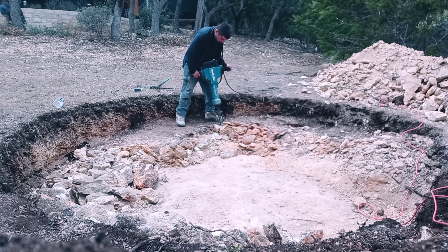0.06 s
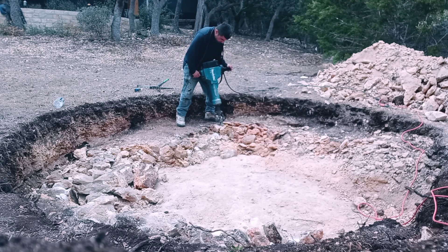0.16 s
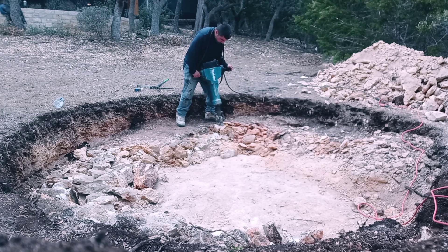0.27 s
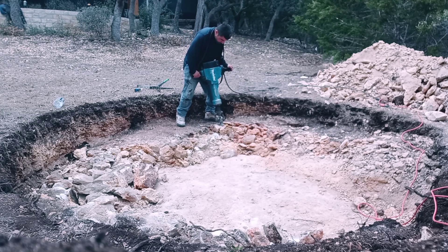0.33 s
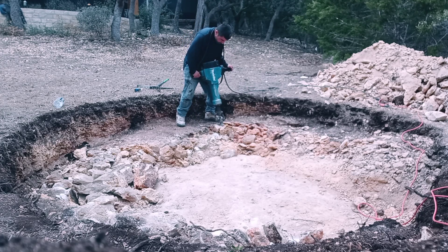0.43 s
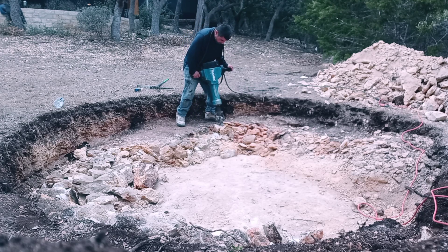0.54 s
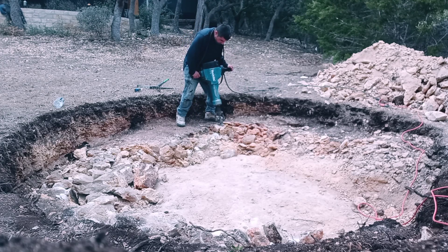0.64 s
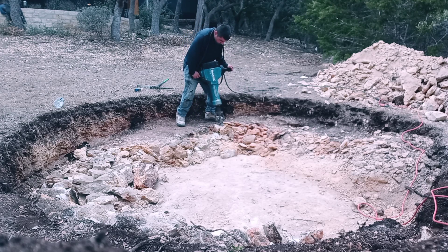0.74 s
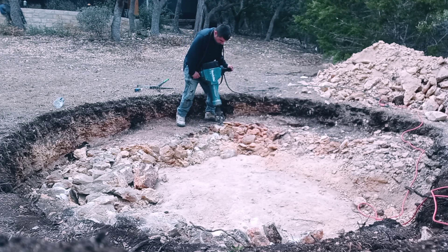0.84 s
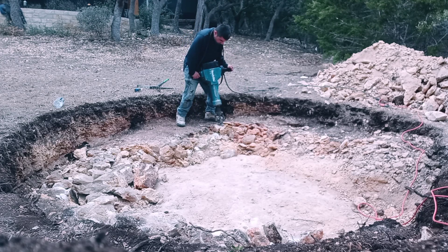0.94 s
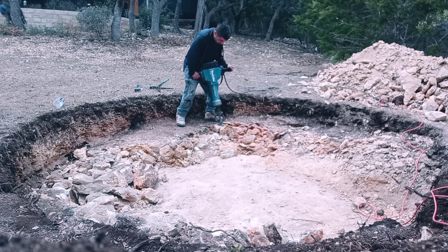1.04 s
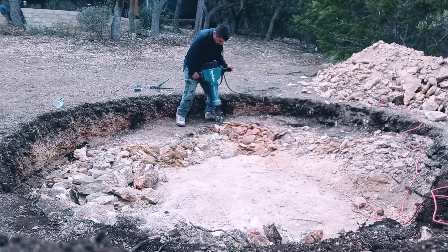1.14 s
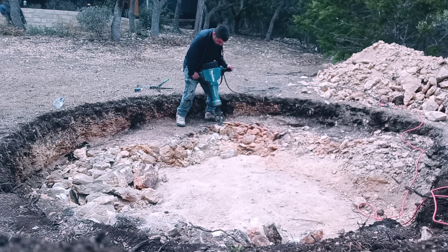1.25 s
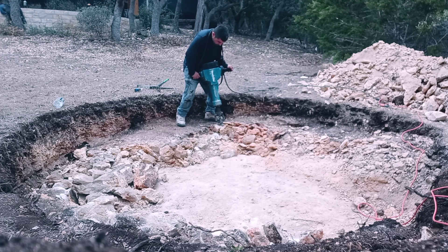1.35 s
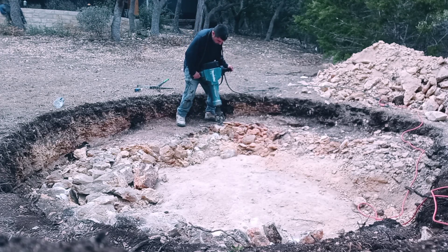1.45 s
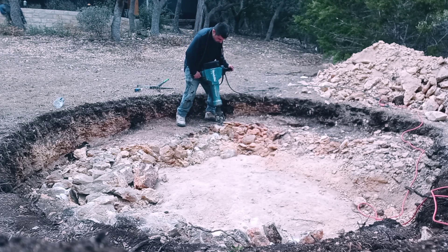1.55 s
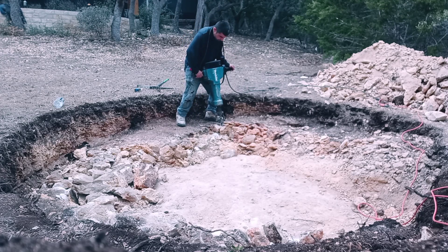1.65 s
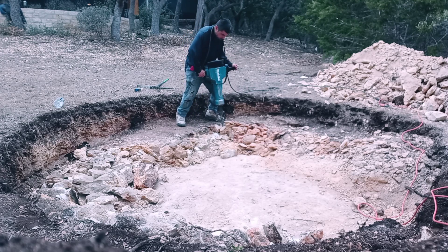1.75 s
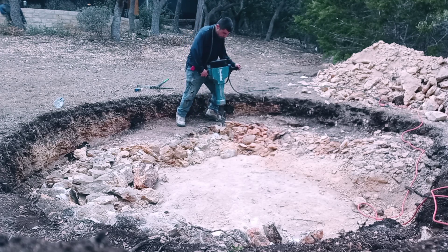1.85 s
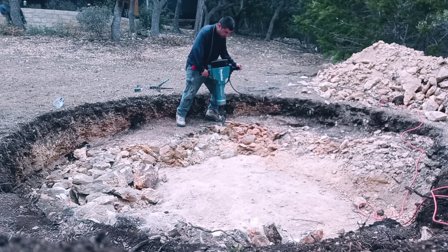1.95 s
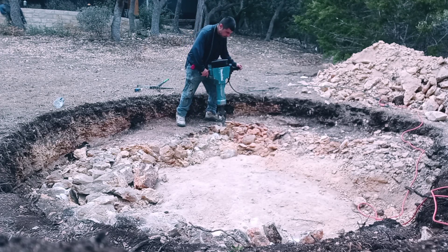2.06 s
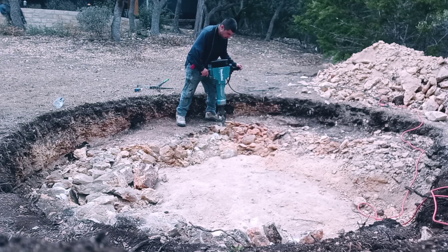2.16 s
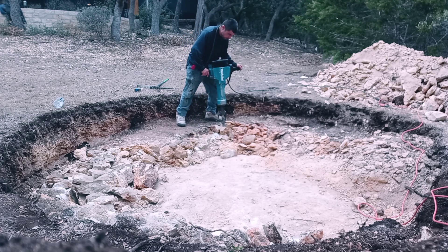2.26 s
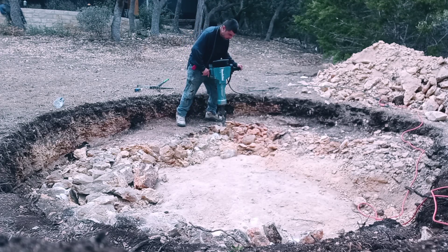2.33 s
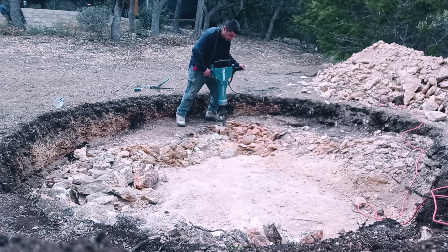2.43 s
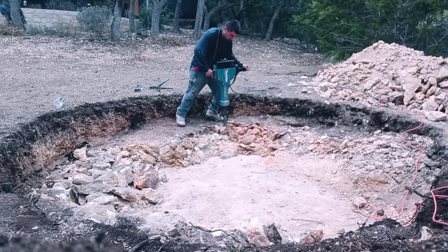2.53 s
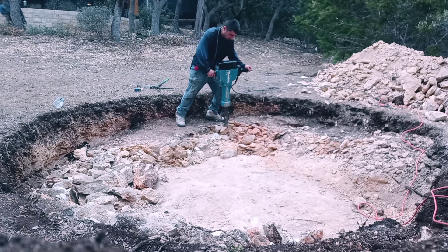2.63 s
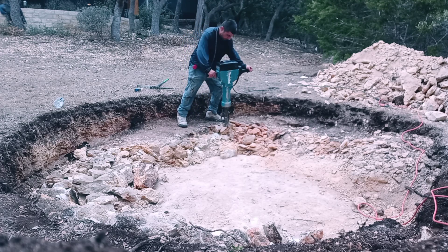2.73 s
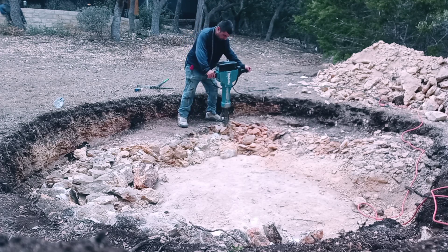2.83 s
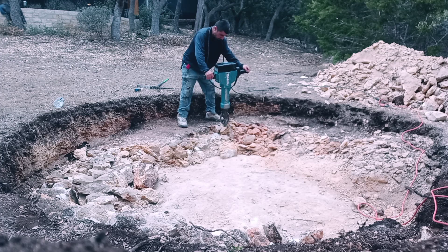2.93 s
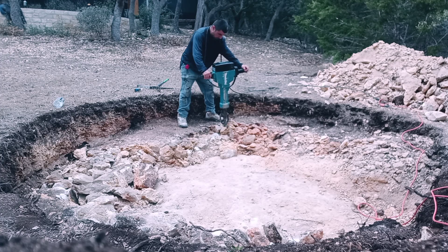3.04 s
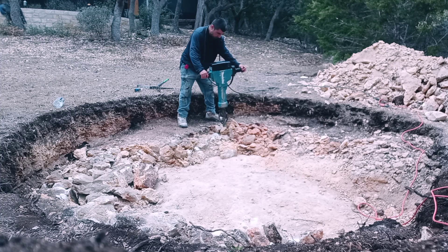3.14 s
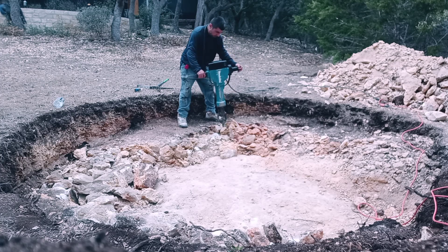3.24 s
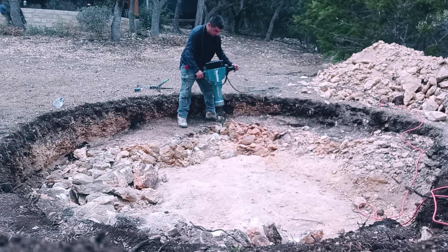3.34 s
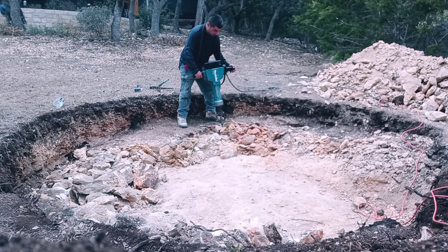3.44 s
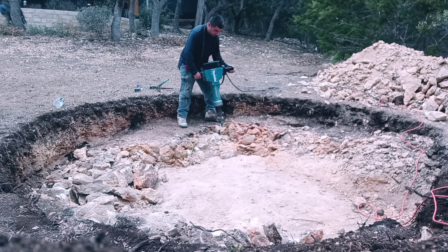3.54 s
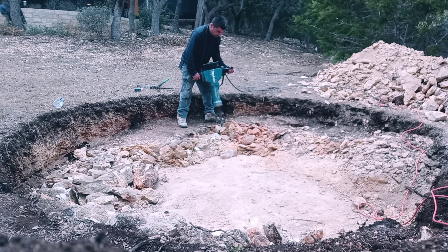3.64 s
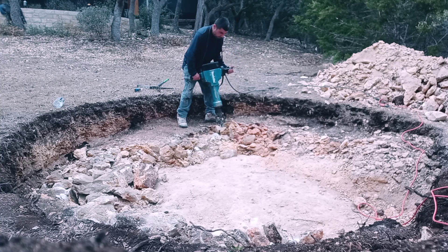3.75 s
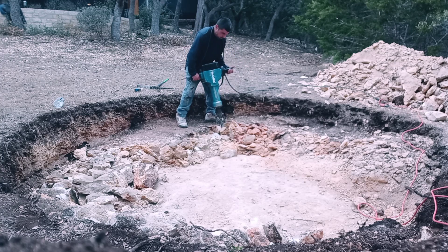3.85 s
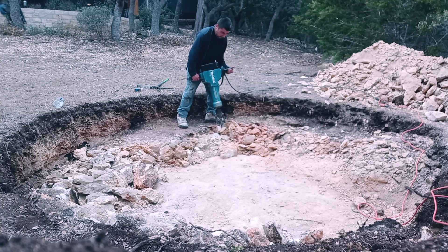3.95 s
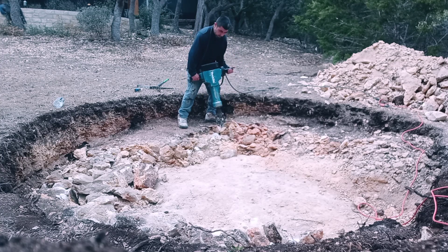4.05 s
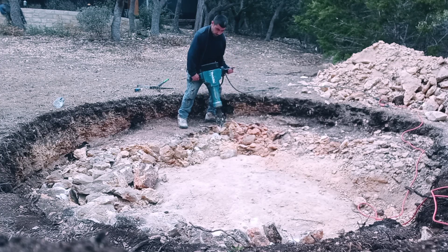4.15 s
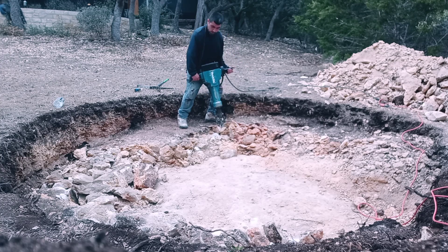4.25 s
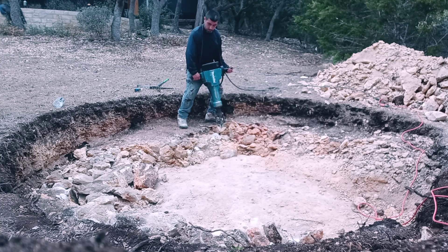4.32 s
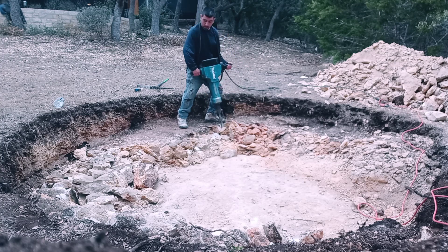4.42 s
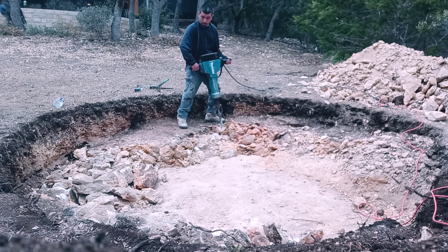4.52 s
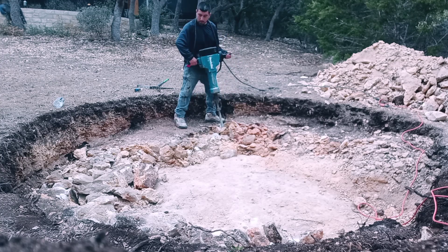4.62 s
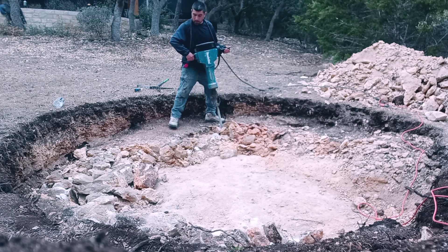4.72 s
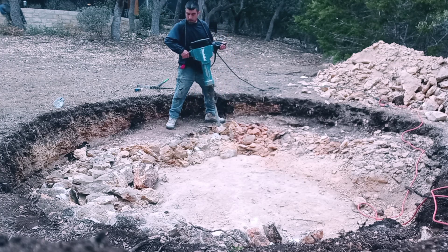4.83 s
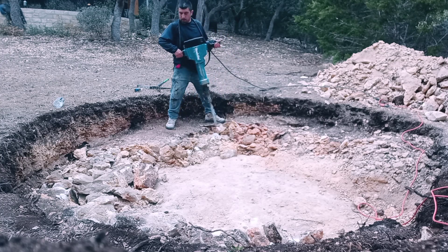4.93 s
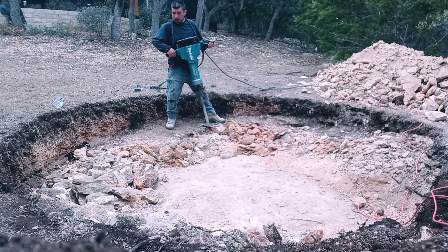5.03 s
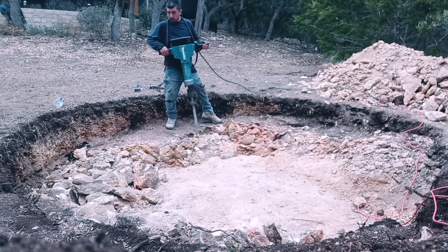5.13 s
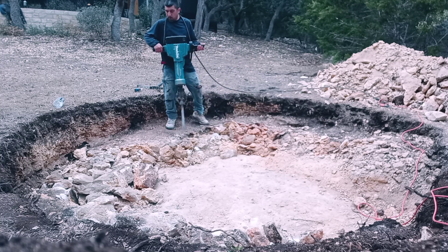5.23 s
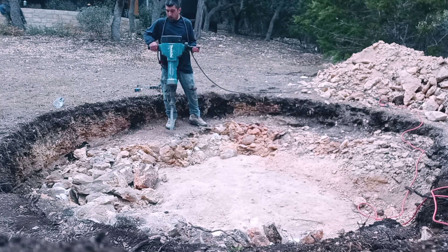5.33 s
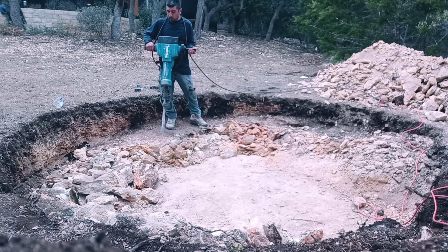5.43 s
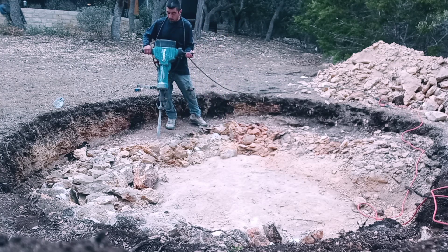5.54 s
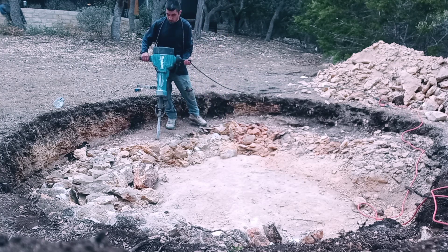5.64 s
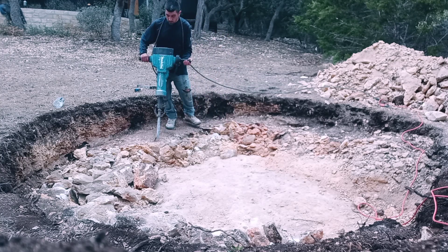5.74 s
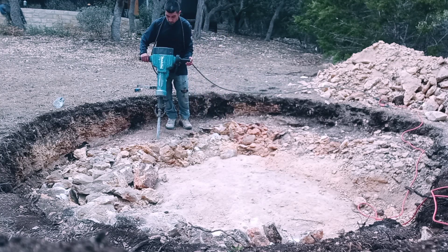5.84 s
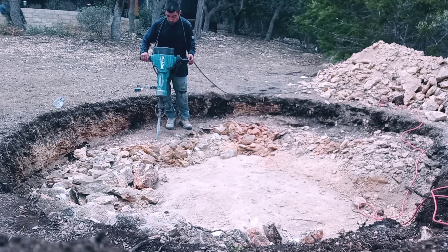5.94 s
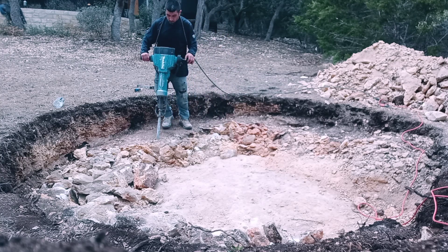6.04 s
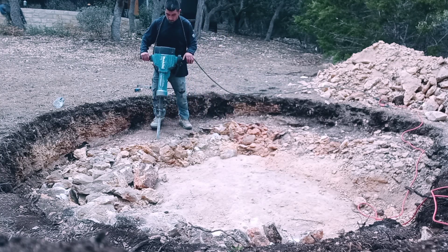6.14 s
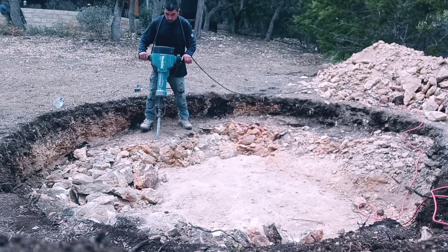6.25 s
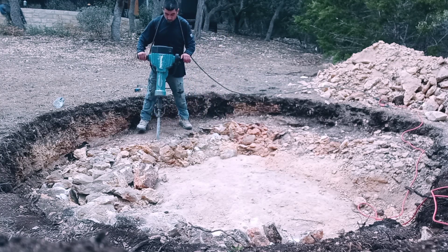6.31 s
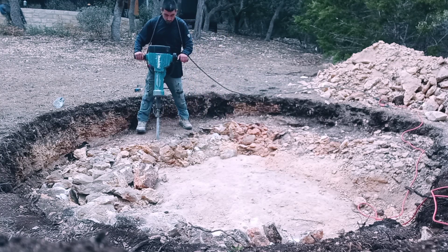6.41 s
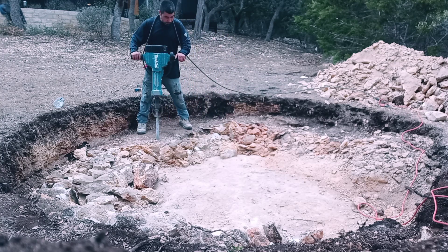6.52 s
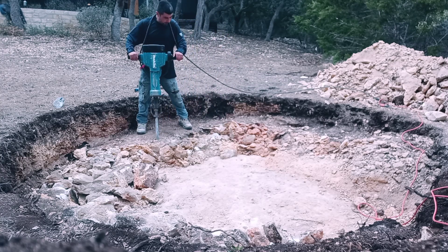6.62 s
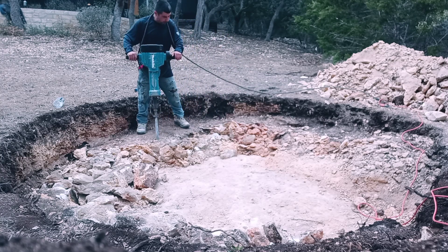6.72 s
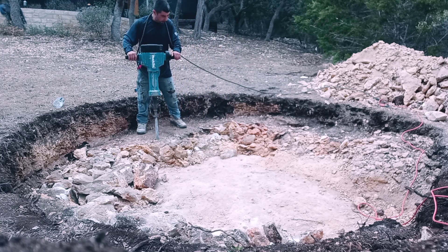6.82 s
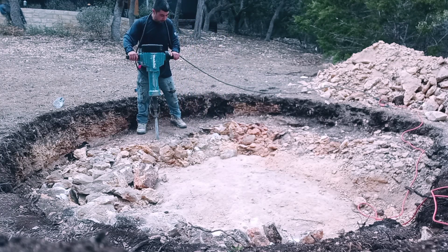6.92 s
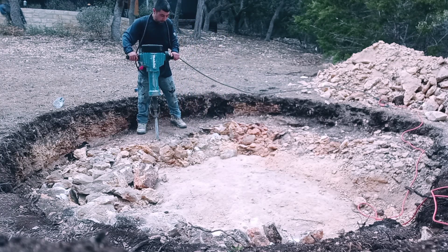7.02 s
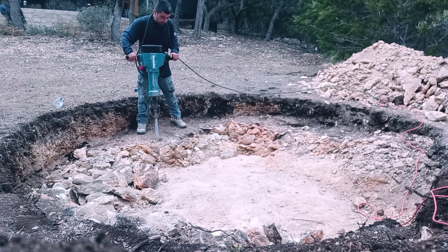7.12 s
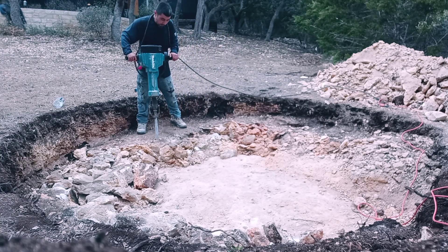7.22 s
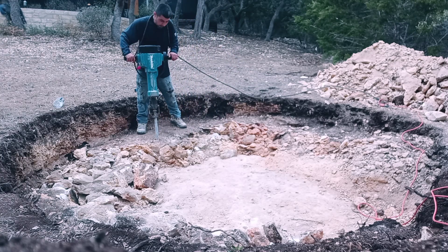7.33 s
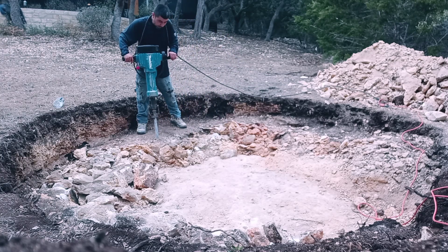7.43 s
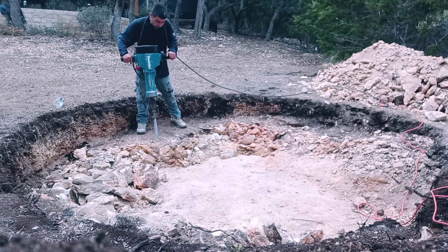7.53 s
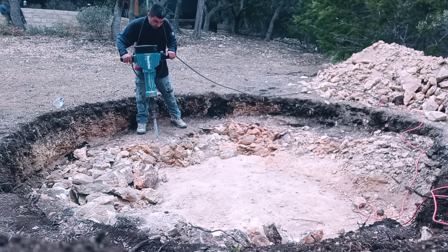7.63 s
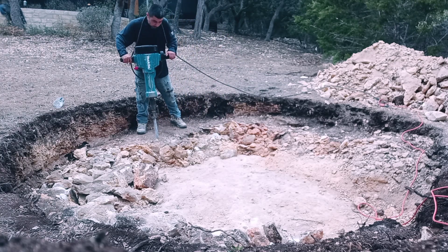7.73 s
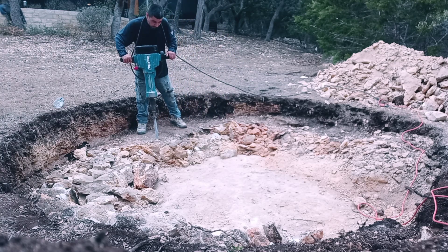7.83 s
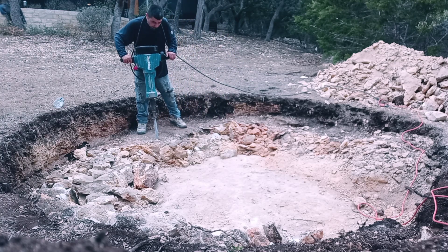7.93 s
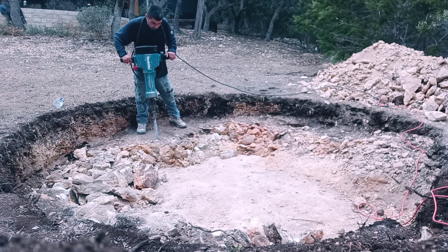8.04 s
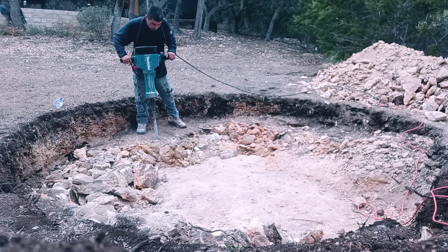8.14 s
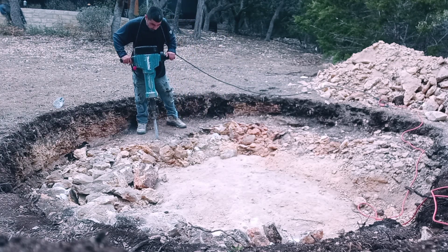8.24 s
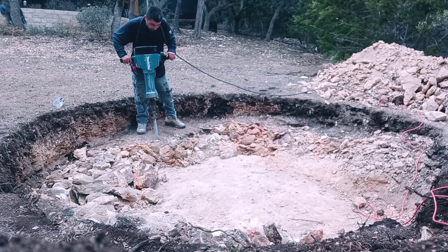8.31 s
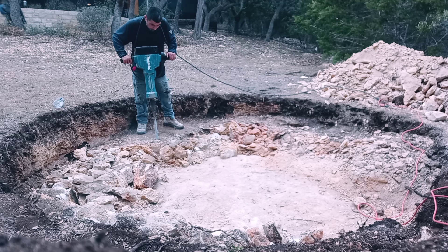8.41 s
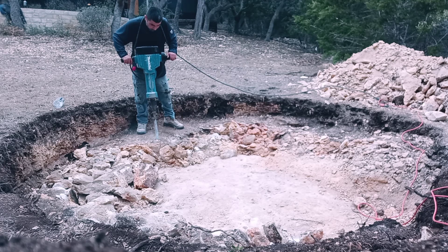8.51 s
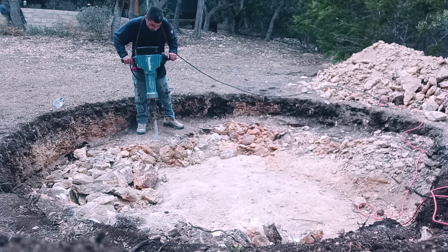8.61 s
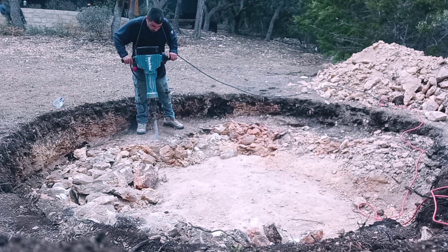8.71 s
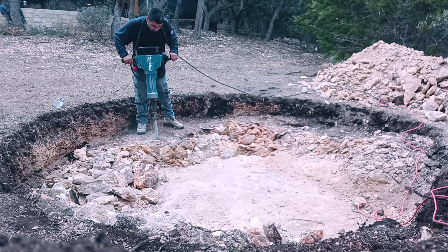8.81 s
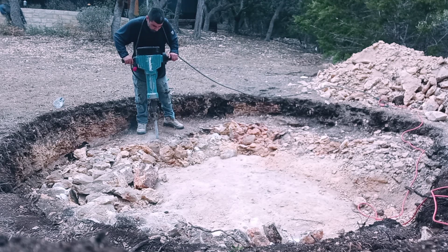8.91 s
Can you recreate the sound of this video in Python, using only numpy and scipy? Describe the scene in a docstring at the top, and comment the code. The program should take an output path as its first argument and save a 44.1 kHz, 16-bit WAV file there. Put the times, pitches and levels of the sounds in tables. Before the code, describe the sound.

Outdoors, fast jackhammer blows crunch stone, slow and stop; the motor whine sags, steel knocks, and brighter, ringing hammering resumes.

```python
"""Breaker hammer on rocky ground

An electric hammer pounds rubble outdoors, its motor runs down, and it starts again on firm rock with a brighter ring.
Blows are bursts of gritty noise with a thump from the ground and a ringing chisel; pit wall and trees echo them.
The motor is fan noise, ticks and gear whine; clacks, light wind and a bird's whistle fill the scene.
All levels in dB are relative, before the final rounding of the peaks.
"""
import sys
import numpy as np
from scipy import signal
from scipy.io import wavfile
from scipy.ndimage import uniform_filter1d, map_coordinates

SR = 44100
rng = np.random.default_rng(int(sys.argv[2]) if len(sys.argv) > 2 else 0)


def bounce(signal):
    """Save signal as a 16-bit WAV file at the path given by the first command-line argument."""
    frames = np.transpose(np.atleast_2d(signal))
    limited = np.clip(frames, -1, 1)
    pcm = np.round(limited * 32767).astype(np.int16)
    wavfile.write(sys.argv[1], SR, pcm)


N = 395577
TIME = np.arange(N) / SR

# Colour of quiet outdoor air: [f/Hz, level/dB]
AIR_COLOUR = [(25, -13.5), (130, 17), (300, 7.5), (800, 5.5), (1300, -16), (2600, -27.5), (4000, -29.5),
              (8000, -17.5), (15500, -14)]
# Colour of wind on the microphone: [f/Hz, level/dB]
WIND_COLOUR = [(25, -27), (45, -10), (85, 2.5), (140, -3), (260, -9.5), (900, -61)]
# Gusts on the microphone: [t/s, level/dB, half-length/s]
GUSTS = [(.13, -34.5, 0.16), (0.487, -39, 0.11), (1.578, -36, 0.14), (2.2, -44, .08), (2.54, -39.5, .08),
         (3.562, -36, .16), (4.917, -56, 0.054)]
# How long the echo lasts, as the time to fall by 60 dB: [f/Hz, fall time/s]
ECHO_FALL = [(150, 0.12), (850, 0.5), (1600, 0.57), (2400, 0.53), (4300, 0.42), (9000, 0.26), (15000, 0.26)]
# Colour of the fan noise: [f/Hz, level/dB]
FAN_COLOUR = [(40, -37), (200, -14), (380, 4.5), (600, -6), (850, 1.5), (1250, -8.5), (1600, -3.5),
              (2600, -14.5), (3900, -1.5), (5000, -10), (6200, -12.5), (8000, -19), (10000, -21),
              (15500, -29)]
# Ringing tones of the hammer's casing: [f/Hz, width/Hz, level/dB]
CASING_MODES = [(765, 52, -8), (880, 60, -30), (1063, 20, -19.5), (1650, 160, -9), (2937, 100, -4.5),
                (4317, 99, 0.5)]
# Colour of the casing hum: [f/Hz, level/dB]
CASING_COLOUR = [(350, -3.0), (750, -2.5), (1600, -7.5), (2500, -27.5)]
# Two gears in the whine: [pitch ratio, level/dB]
GEARS = [(1, 1), (1.21, -4)]
# Colour of the starting growl: [f/Hz, level/dB]
GROWL_COLOUR = [(150, -18), (400, 3), (560, -6), (800, 4), (1400, -6), (2200, -7), (4000, -21), (9000, -28)]
# Loose chisel, trigger and boots knock and scuff: [t/s, clack level/dB, thud level/dB, length/s]
KNOCKS = [(4.46, -21.5, -27, 0.0082), (4.469, -16.5, -31, 0.0092), (4.806, -45, -44, 0.01),
          (4.855, -37, -43, 0.015), (5.094, -39.5, -48, 0.022), (5.256, -70, -42, 0.064),
          (5.631, -18, -41, 0.0092), (5.639, -14.5, -37, 0.01), (5.67, -19.5, -30.5, 0.01),
          (5.684, -31, -23.5, 0.018), (5.701, -20, -23.5, 0.0042), (5.874, -49.5, -38.5, 0.025),
          (6.068, -22.5, -24.5, 0.0071), (6.218, -54, -47, 0.045), (6.506, -62, -48, 0.0093),
          (6.55, -27, -28, 0.007), (6.803, -80, -52, 0.06), (6.881, -40, -36, 0.006)]
# Colour of the steel clacks: [f/Hz, level/dB]
CLACK_COLOUR = [(60, -17), (300, -4.0), (900, -5.0), (1600, -0.5), (2200, -3), (2900, 0.0), (4400, 6),
                (6400, 2.5), (7700, -4), (10500, -1.5), (12000, -12), (15500, -7)]
# Colour of the dull thuds: [f/Hz, level/dB]
THUD_COLOUR = [(50, -22), (200, -4.5), (400, 0.5), (580, -7.5), (850, 2.0), (2200, -37)]
# Colour of steel on stone, in loose rubble: [f/Hz, level/dB]
RUBBLE_COLOUR = [(90, -14.5), (350, -5.5), (700, 0), (1350, -8), (3000, -8.5), (3700, 0.5), (5600, -1.5),
                 (6900, -1.5), (7700, -11.5), (10900, -7.5), (11600, -14), (15500, -18)]
# Colour of steel on stone, on firm rock: [f/Hz, level/dB]
FIRM_COLOUR = [(90, -24), (350, 3), (600, -7.5), (850, -0.5), (1350, -9), (3400, -6.5), (4300, 1.5),
               (5500, -3), (6300, 5.5), (7700, -3), (10500, -11.5), (11700, -16)]
# Ringing tones of the chisel: [f/Hz, width/Hz, level in rubble/dB, level on firm rock/dB]
CHISEL_MODES = [(3690, 150, 3, -22), (5102, 42, -1, -6), (6037, 60, -7, -7), (8010, 38, -21, -16),
                (8360, 65, -16, -16), (10168, 80, -7, -1), (10255, 90, -2, -3), (10670, 35, -16, -19),
                (12469, 50, -24, -14), (13218, 60, -14, -14), (14450, 600, -5, -11), (14675, 60, -5, -3.5),
                (14981, 60, -17, -13)]
# Speed of the striker in rubble, from the first blow on: [t/s, blows per s]
RATE_RUBBLE = [(0, 14.92), (1.005, 15.215), (1.794, 14.821), (2.357, 17.178), (3.089, 18.147),
               (3.571, 15.245), (3.902, 10.849), (4.35, 7.206)]
# Speed of the striker on firm rock, from the first blow on: [t/s, blows per s]
RATE_FIRM = [(7.028, 8.873), (7.298, 13.447), (7.614, 14.468), (8.2, 14.971), (8.97, 15.015)]
# Ordinary blows as the chisel works into rubble, before small trims:
# [t/s, crack level/dB, rattle level/dB, chisel ring level/dB, ground thump level/dB]
SEAT_RUBBLE = [(0, -18.5, -20, -31.5, -24), (1.3, -21, -19.5, -35, -21), (2.4, -19, -20.5, -36, -23.5),
               (2.68, -21.5, -19.5, -50, -20.5), (3.05, -18, -19, -35, -17.5),
               (3.3, -19.5, -19, -33.5, -25), (3.55, -15, -20, -35.5, -22.5), (3.9, -12, -21.5, -37, -21),
               (4.3, -17, -22.5, -56, -26)]
# The same on firm rock:
# [t/s, crack level/dB, rattle level/dB, chisel ring level/dB, ground thump level/dB]
SEAT_FIRM = [(7.03, -13.5, -23, -33, -36), (7.2, -17, -21.5, -25.5, -24.5), (7.5, -23.5, -19.5, -22, -21),
             (7.72, -22, -26.5, -21, -20.5), (7.88, -21, -21, -22.5, -21), (8.35, -24.5, -18.5, -25.5, -18),
             (8.62, -21, -17.5, -30.5, -18.5), (8.93, -12.5, -27, -23.5, -21.5)]
# Hard bites, where steel meets solid stone: [t/s, extra crack level/dB, extra thump level/dB]
BITES = [(.133, 11, 4.5), (.333, 11, 4.5), (.469, 10, 3.5), (.534, 5.5, 6), (.732, 6, 3), (.995, 8, 3),
         (1.194, 11, 1), (1.392, 11, 5), (1.46, 10, 3), (1.591, 9, 2), (1.795, 13, 5), (1.992, 9.5, 6),
         (2.055, 9.5, 7.5), (2.175, 9, 4), (2.239, 2, 6.5), (2.357, 5, 10), (2.415, 9.5, 6),
         (2.474, 6.5, 9), (2.533, 14.5, 3.5), (2.814, 5.5, 5.5), (2.872, 9.5, -1), (3.093, 5.5, 4.5),
         (3.149, 9, 0.5), (3.205, 7, -1.5), (3.508, 6.5, -1), (3.572, 6, 1.5), (3.712, 6.5, 3),
         (3.791, 2, 2), (3.875, 4, 3), (3.969, 2, 0), (4.069, 1, 1.5), (7.371, 9, 3.5), (7.791, 9, 0),
         (8.129, 8, 3), (8.531, 2, 2), (8.73, 5, 2.5)]

# Background: a light wind that slowly drops, and a far bird's thin rising whistle
BREEZE_DB, BREEZE_FADE_DB_PER_S = -48, 4
BIRD_S, BIRD_LENGTH_S, BIRD_HZ, BIRD_RISE_HZ, BIRD_DB = 6.31, .23, 6760, 270, -66.5

# Motor and fan: levels in the first and second bout, an ever faster fade, then the restart
RUN_DB, LOADED_DB = -40, -34
COAST_S, COAST_DB_PER_S, BRAKE_DB_PER_S2 = 4.31, 1.2, 5
RESTART_S, RESTART_DB, SPIN_UP_S = 6.88, -44, 0.085  # start time, first level, time constant
WHINE_HZ, WHINE_SAG_HZ_PER_S = 1032, 170  # lower gear's pitch at COAST_S, and its fall
WHINE_DB, WHINE_PEAK_S, WHINE_RISE_DB_PER_S, WHINE_FADE_DB_PER_S = -42, 4.4, 69.5, 7.5
# Growl: level, final turning rate, time constants of the speeding up and of the fade
GROWL_DB, GROWL_TOP_HZ, GROWL_RISE_S, GROWL_FADE_S = -35.5, 230, .07, 0.16

# Blows: chance from blow to blow, in dB and as a share of the thump's pitch
CRACK_SCATTER_DB, RATTLE_SCATTER_DB, RING_SCATTER_DB, THUMP_SCATTER_DB = 1, 0.65, 0.8, 1.0
THUMP_PITCH_SCATTER = 0.015
THUMP_RUBBLE_HZ, THUMP_FIRM_HZ = 419.4, 307  # bounce of the ground at the usual speed
USUAL_RATE = 15  # blows per s
THUMP_STIFFENING = 0.11  # faster blows raise the thump's pitch: exponent of the speed
BITE_RATTLE = 0.19  # a bite leaves less rebound: rattle dB lost per dB of extra crack

EDGE_HZ = 15800  # upper edge of the final sound


def amp(db):
    """Turns decibels into a gain."""
    return 10 ** (np.asarray(db) / 20)


def evened(x):
    """Scales a sound to an average strength (rms) of 1."""
    return x / np.sqrt(np.mean(x ** 2) + 1e-20)


def read(points, hz):
    """Reads a curve between its points, on a log-frequency axis."""
    f, value = np.transpose(points)
    return np.interp(np.log(hz + 1), np.log(f), value)


def curves(rows, s):
    """Reads each column of a table at the times s."""
    at, *columns = np.transpose(rows)
    return [np.interp(s, at, column) for column in columns]


def add(mix, s, sound):
    """Adds a sound into the mix at time s."""
    start = max(round(s * SR), 0)
    part = mix[start:][:len(sound)]
    part += sound[:len(part)]


def colour(x, points):
    """Shapes a sound with a spectrum; the filter has unit energy and never acts ahead of time."""
    hz = abs(np.fft.fftfreq(4096, 1 / SR))
    log_gain = np.log(amp(read(points, hz)))
    # the Hilbert transform supplies the phase that gathers the energy at the start
    response = np.exp(np.conj(signal.hilbert(log_gain)))
    taps = np.fft.ifft(response).real[:2048]
    return signal.oaconvolve(x, taps / np.linalg.norm(taps))[:N]


def resonate(x, hz, width_hz):
    """Rings one tone of unit energy; a narrower width rings longer."""
    r = np.exp(-np.pi * width_hz / SR)
    pole = r * np.exp(2j * np.pi * hz / SR)
    return signal.lfilter([np.sqrt(2 * (1 - r * r))], [1, -pole], x).real


def grit(size, spread_db):
    """Makes dense tiny impacts of unequal strength, in clumps of about half a millisecond."""
    clumps = np.repeat(rng.standard_normal(size // 20 + 1), 20)[:size]
    return evened(rng.standard_normal(size) * amp(spread_db * clumps))


def mottled(x, patchy_db, patch_hz, patch_s):
    """Contacts keep shifting, so patches of the noise grow and fade in pitch and time."""
    hz, t, z = signal.stft(x, SR, nperseg=1024)
    knots = rng.standard_normal((600, 900))
    where = np.meshgrid(hz / patch_hz, t / patch_s, indexing="ij")
    patches = evened(map_coordinates(knots, where, order=1, mode="mirror"))
    patchy = signal.istft(z * amp(patchy_db * patches), SR, nperseg=1024)[1]
    return evened(patchy[:len(x)])


def burst(t, length, steep):
    """Holds for a length of time, then falls away."""
    return 1 / (1 + (t / length) ** steep)


def outdoors():
    """Quiet air and wind are coloured noise; the bird is one gliding tone."""
    wind = amp(BREEZE_DB - BREEZE_FADE_DB_PER_S * TIME)
    for s, db, length in GUSTS:
        wind += amp(db) * np.exp(-((TIME - s) / length) ** 2)
    u = np.clip((TIME - BIRD_S) / BIRD_LENGTH_S, 0, 1)  # progress through the whistle
    hz = BIRD_HZ + BIRD_RISE_HZ * np.sin(np.pi / 2 * u)
    bird = amp(BIRD_DB) * np.sin(np.pi * u) * np.sin(2 * np.pi * np.cumsum(hz) / SR)
    air = amp(-58) * colour(rng.standard_normal(N), AIR_COLOUR)
    return air + wind * colour(rng.standard_normal(N), WIND_COLOUR) + bird


def echo(x):
    """Pit wall and trees scatter the sound; three fading tails take turns as the operator sways."""
    out = np.zeros(N)
    for k in range(3):
        # sparse random reflections, none in the first 7 ms
        chosen = rng.standard_normal(SR) * (rng.random(SR) < 3000 / SR)
        taps = chosen * (TIME[:SR] > .007)
        hz, t, z = signal.stft(taps, SR, nperseg=256)
        fall = amp(-60 * t / read(ECHO_FALL, hz)[:, None])
        tail = signal.istft(z * fall, SR, nperseg=256)[1]
        turn = np.sqrt(2 / 3) * np.cos(2 * np.pi * (1.3 * TIME + k / 3))
        out += signal.fftconvolve(x * turn, tail / np.linalg.norm(tail))[:N]
    return out


def housing(x):
    """The hammer's casing rings at several tones when shaken."""
    return sum(amp(db) * resonate(x, hz, width) for hz, width, db in CASING_MODES)


def motor_level():
    """The motor's level in dB holds, falls ever faster as it coasts, and rises on restarting."""
    coasting = np.maximum(TIME - COAST_S, 0)
    restarted = np.maximum(TIME - RESTART_S, 0)
    first = RUN_DB - COAST_DB_PER_S * coasting - BRAKE_DB_PER_S2 * coasting ** 2
    second = LOADED_DB + (RESTART_DB - LOADED_DB) * np.exp(-restarted / SPIN_UP_S)
    return np.where(TIME < RESTART_S, first, second)


def motor():
    """The fan rushes, the casing hums, loose parts tick, and two gears whine unsteadily."""
    level_db = motor_level()
    clatter = evened(uniform_filter1d(uniform_filter1d(rng.standard_normal(N), 600), 400))
    air = mottled(grit(N, spread_db=3), patchy_db=2.5, patch_hz=140, patch_s=.07)

    # piston and crank knock in their play: about 22 ticks a second, each fading over 12 ms
    impulses = rng.random(N) * (rng.random(N) < 22 / SR)
    ticks = signal.lfilter([1], [1, -np.exp(-1 / (.012 * SR))], impulses)
    rush = amp(level_db + 2.0 * clatter) * colour(air * (1 + 0.54 * ticks), FAN_COLOUR)
    casing = amp(0.5 * level_db - 34) * colour(housing(air), CASING_COLOUR)

    hz = WHINE_HZ - WHINE_SAG_HZ_PER_S * (TIME - COAST_S)
    after_peak = TIME - WHINE_PEAK_S
    whine_db = WHINE_DB - np.maximum(-WHINE_RISE_DB_PER_S * after_peak, WHINE_FADE_DB_PER_S * after_peak)
    turns = np.cumsum(hz) / SR
    slow_filter = signal.butter(2, 18, fs=SR, output="sos")
    whine = np.zeros(N)
    for ratio, gear_db in GEARS:
        flutter = evened(signal.sosfilt(slow_filter, rng.standard_normal(N)))
        whine += amp(whine_db + gear_db) * flutter * np.sin(2 * np.pi * ratio * turns)
    return rush + casing + whine


def growl():
    """On starting, the armature jolts the gears once a turn, faster and faster, while the growl fades."""
    t = np.arange(SR // 2) / SR
    turns = np.cumsum(GROWL_TOP_HZ * (1 - np.exp(-t / GROWL_RISE_S))) / SR
    jolts = np.diff(np.floor(turns), prepend=0)
    jolts *= 1 + 0.32 * rng.standard_normal(len(t))
    out = np.zeros(N)
    add(out, RESTART_S, amp(GROWL_DB) * evened(jolts) * np.exp(-t / GROWL_FADE_S))
    return colour(out, GROWL_COLOUR)


def knocks():
    """Short noise bursts make steel clacks with dull thuds; a ringing tone follows the clacks."""
    t = np.arange(SR // 5) / SR
    clacks, thuds = np.zeros(N), np.zeros(N)
    for s, clack_db, thud_db, length in KNOCKS:
        add(clacks, s, amp(clack_db) * grit(len(t), spread_db=0.0) * burst(t, length, steep=3.1))
        add(thuds, s, amp(thud_db) * grit(len(t), spread_db=1.5) * burst(t, length, steep=4.1))
    holder = amp(-6.5) * resonate(clacks, 6110, 120)
    return colour(clacks, CLACK_COLOUR) + holder + colour(thuds, THUD_COLOUR)


def thump(t, hz, cycles, delay):
    """The ground is pushed down and springs back as a short, smoothly fading wave."""
    u = (t - delay) * hz
    return 2.3 * np.exp(-(u / cycles) ** 2) * np.cos(2 * np.pi * u)


def blows(speed, seat, firm):
    """Each crank turn gives one blow: time, stroke length, ground, four levels and thump pitch."""
    t = np.arange(speed[0][0], speed[-1][0], 1 / SR)
    rate, = curves(speed, t)
    turns = np.cumsum(rate) / SR
    s = np.interp(np.arange(int(turns[-1]) + 1), turns, t)  # times of the whole turns
    per_s = np.interp(s, t, rate)
    stroke = np.clip(1 / per_s, .055, .08)  # seconds

    # a bite belongs to the blow within half a stroke of it
    bite_db, heave_db = sum(np.outer(extra, abs(s - at) < stroke / 2) for at, *extra in BITES)
    ordinary = bite_db == 0
    crack_db, rattle_db, ring_db, thump_db = curves(seat, s)
    chance = rng.standard_normal((len(s), 5)).T
    crack_db = crack_db + bite_db + CRACK_SCATTER_DB * chance[0] * ordinary
    rattle_db = rattle_db - BITE_RATTLE * bite_db + RATTLE_SCATTER_DB * chance[1]
    ring_db = ring_db + RING_SCATTER_DB * chance[2]
    thump_db = thump_db + heave_db + THUMP_SCATTER_DB * chance[3] * ordinary
    thump_hz = THUMP_FIRM_HZ if firm else THUMP_RUBBLE_HZ
    thump_hz = thump_hz * (per_s / USUAL_RATE) ** THUMP_STIFFENING * (1 + THUMP_PITCH_SCATTER * chance[4])
    return zip(s, stroke, [firm] * len(s), crack_db, rattle_db, ring_db, thump_db, thump_hz, strict=True)


def hammer():
    """Each blow cracks and thumps, then the chisel chatters on the stone until the striker draws back."""
    t = np.arange(SR // 10) / SR
    crushing = mottled(grit(N + len(t), spread_db=3.0), patchy_db=2.0, patch_hz=230.2, patch_s=.07)
    # stone and steel have one row for rubble and one for firm rock
    stone, steel = np.zeros((2, N)), np.zeros((2, N))
    ground, chatter = np.zeros(N), np.zeros(N)
    both_bouts = [*blows(RATE_RUBBLE, SEAT_RUBBLE, firm=0), *blows(RATE_FIRM, SEAT_FIRM, firm=1)]
    for s, stroke, firm, crack_db, rattle_db, ring_db, thump_db, thump_hz in both_bouts:
        grains = crushing[max(round(s * SR), 0):][:len(t)]
        crack = grains * burst(t, length=0.006, steep=3.2)
        # a slower stroke leaves the chisel longer to rebound
        rebound_s = 0.75 * stroke * np.exp(0.11 * rng.standard_normal())
        rebounds = burst(t, length=rebound_s, steep=16)
        add(stone[firm], s, amp(crack_db + 0.1) * crack + amp(rattle_db - 1.5) * grains * rebounds)
        add(chatter, s, amp(rattle_db - 18.5) * grains * rebounds)

        # the chisel rings up just after the blow, and the rebounds keep it going
        kick = 2 * np.exp(-((t - .005) / 0.0024) ** 2)
        drive = kick + 1.7 * rebounds * np.exp(-t / 0.055)
        add(steel[firm], s, amp(ring_db - 1.5) * grit(len(t), spread_db=7) * drive)

        if firm:
            push = -1.2 * thump(t, thump_hz, cycles=0.58, delay=0.00293)
        else:
            push = thump(t, thump_hz, cycles=1.28, delay=0.00441)
        add(ground, s, amp(thump_db + 1.85) * push)

    ring = np.zeros(N)
    for hz, width, loose_db, firm_db in CHISEL_MODES:
        ring += resonate(amp(loose_db) * steel[0] + amp(firm_db) * steel[1], hz, width)
    rock = colour(stone[0], RUBBLE_COLOUR) + colour(stone[1], FIRM_COLOUR)
    # the hammer's body booms, but so small a source gives off little deep bass
    boom = amp(-21.0) * resonate(stone[0] + stone[1], 170, 61)
    low_cut = signal.butter(4, 120, "high", fs=SR, output="sos")
    return signal.sosfilt(low_cut, [rock + ring + housing(chatter) + boom, ground])


def scene():
    """Adds up all sources, with an echo of the blows and knocks."""
    strikes, ground = hammer()
    handling = knocks()
    wet = echo(amp(-10.0) * strikes + amp(-16) * ground + amp(-6.5) * handling)
    return (strikes + ground + handling + wet + motor() + growl() + outdoors())[None]


def record(dry):
    """Rounds off the peaks, then removes what lies above the upper edge."""
    rounded = 1.024 * np.tanh(dry / 1.377)
    low_pass = signal.firwin(511, EDGE_HZ, window=("kaiser", 9), fs=SR)
    return signal.oaconvolve(rounded, low_pass[None], "same")


dry = scene()
out = record(dry)
bounce(out)
```